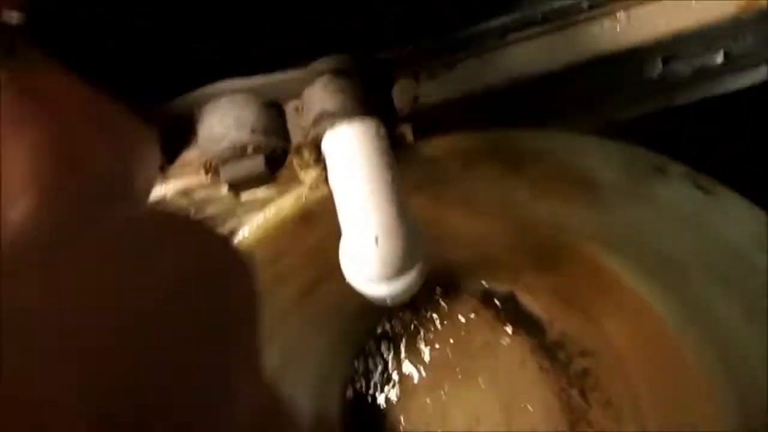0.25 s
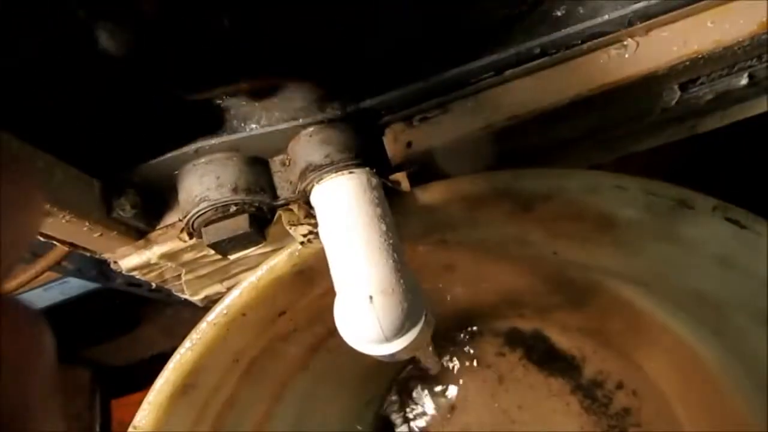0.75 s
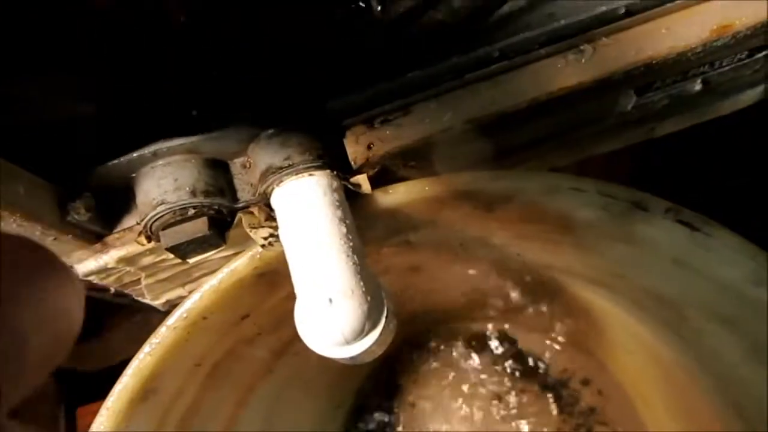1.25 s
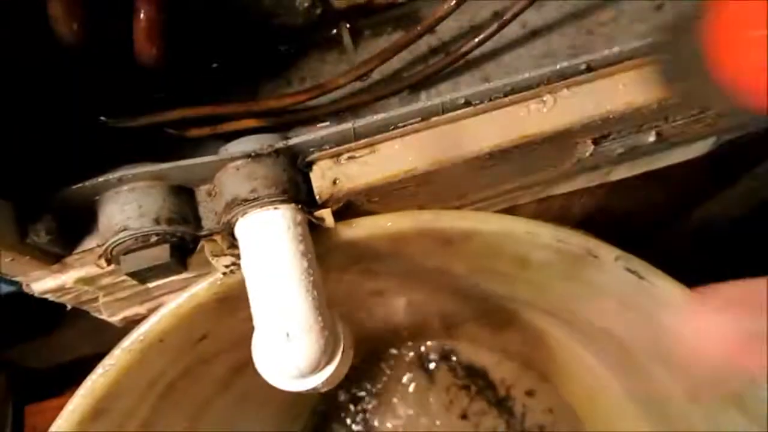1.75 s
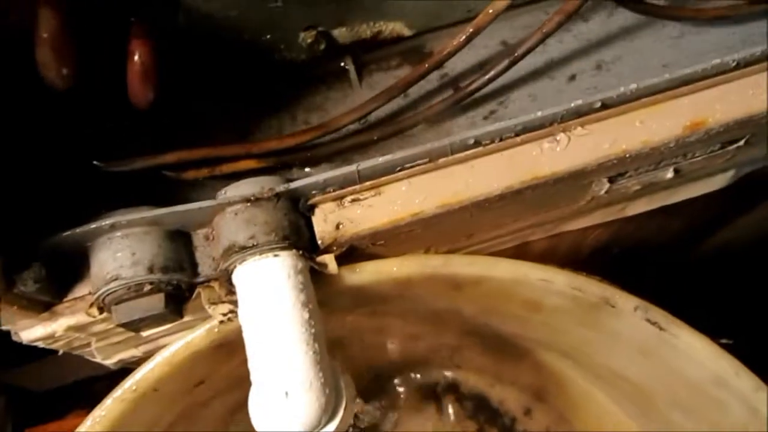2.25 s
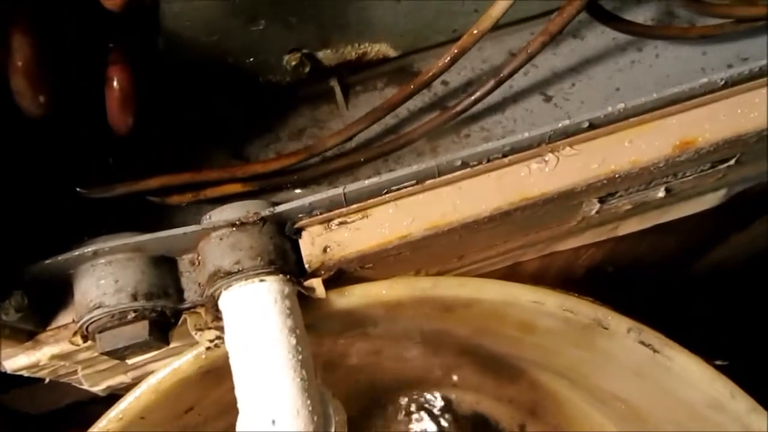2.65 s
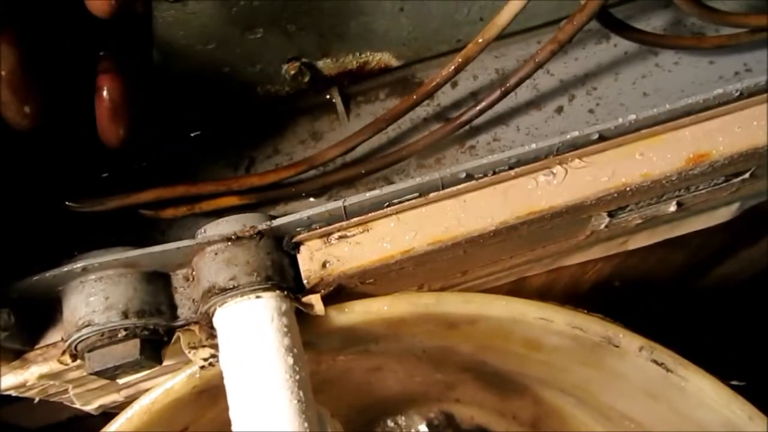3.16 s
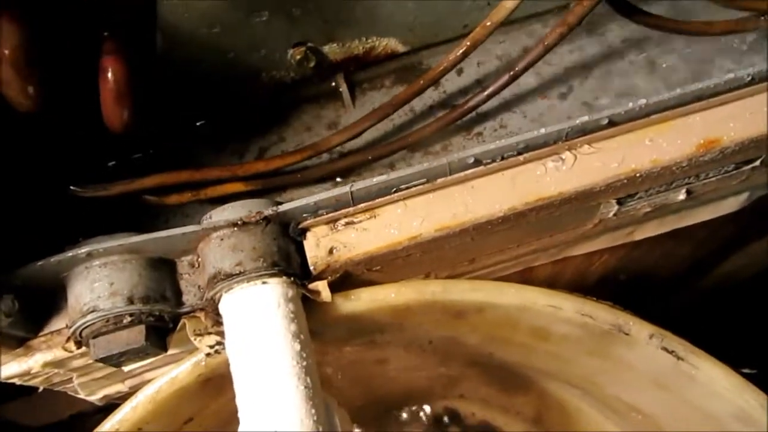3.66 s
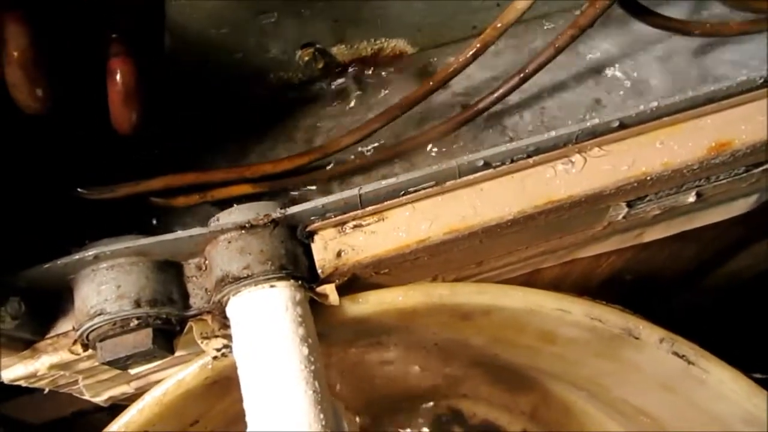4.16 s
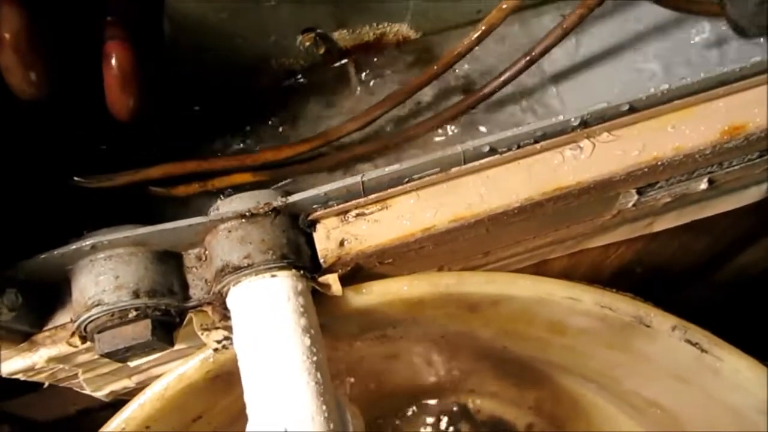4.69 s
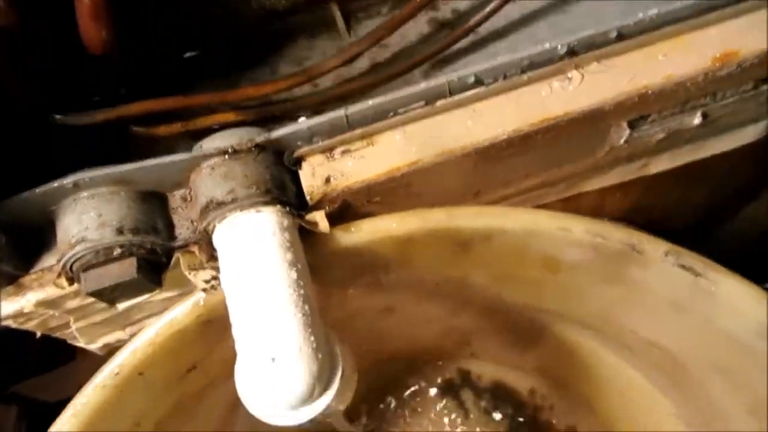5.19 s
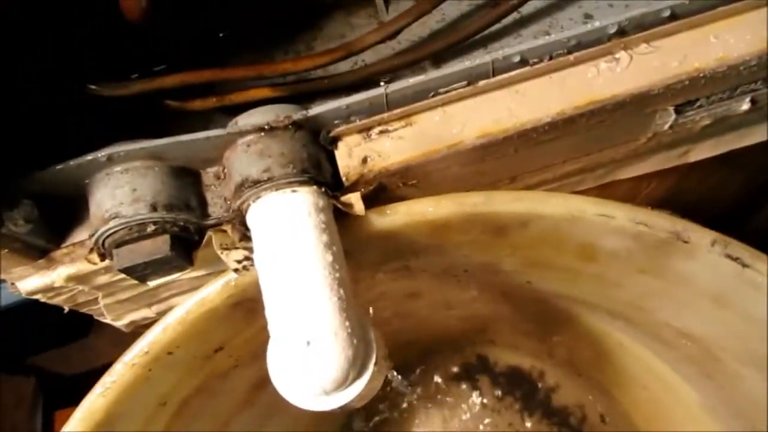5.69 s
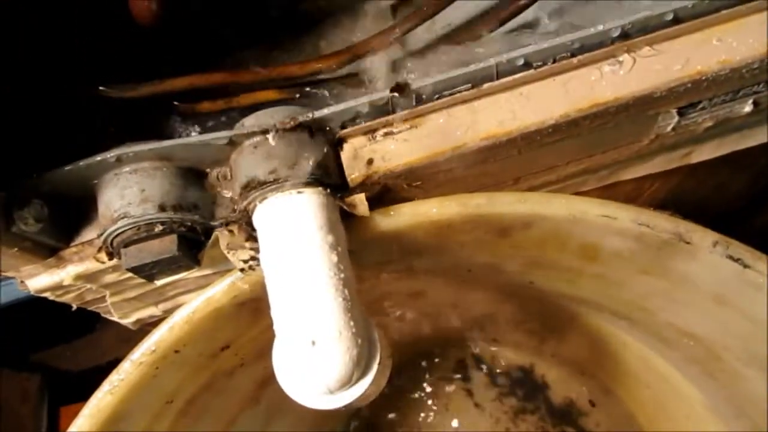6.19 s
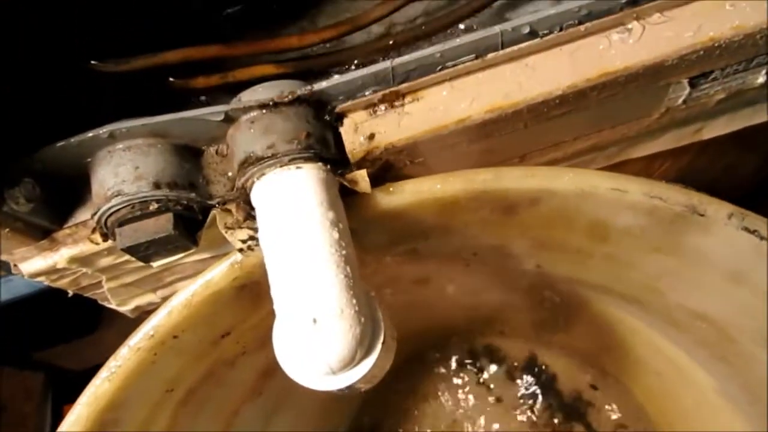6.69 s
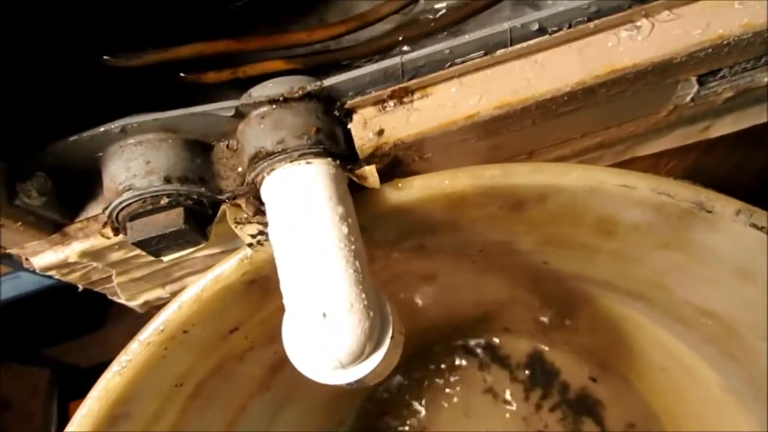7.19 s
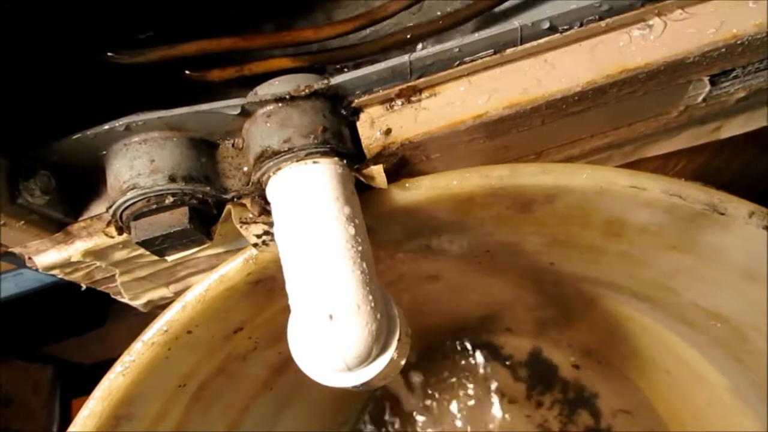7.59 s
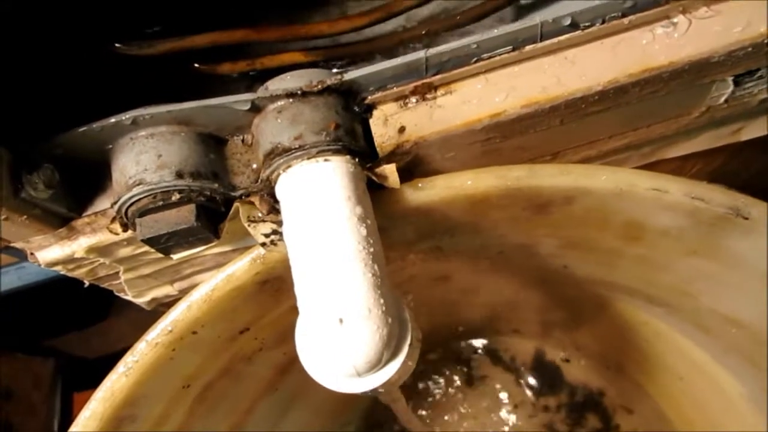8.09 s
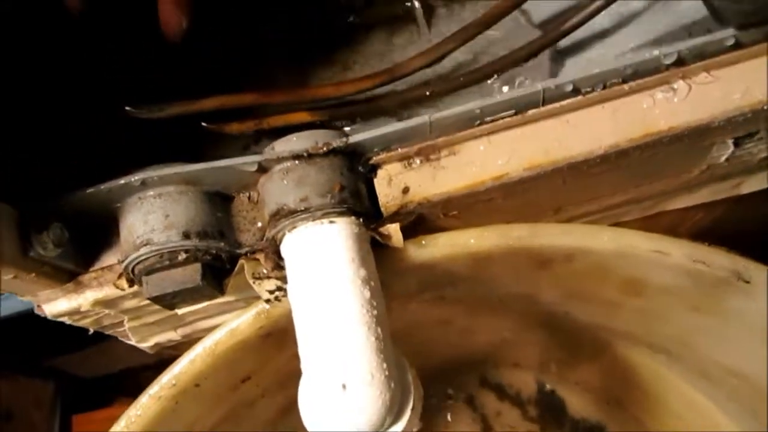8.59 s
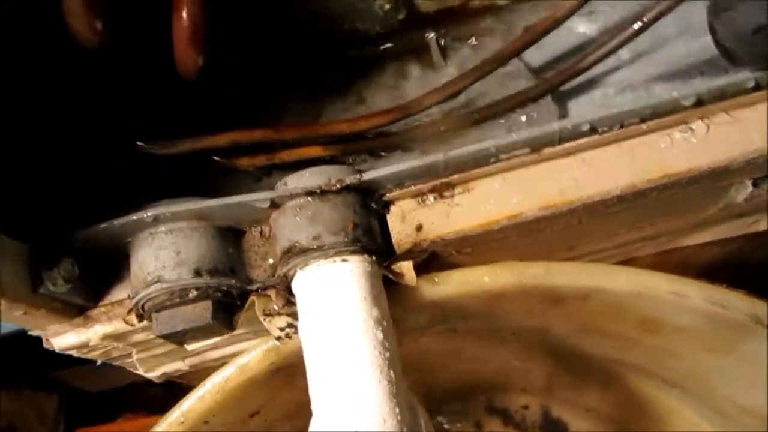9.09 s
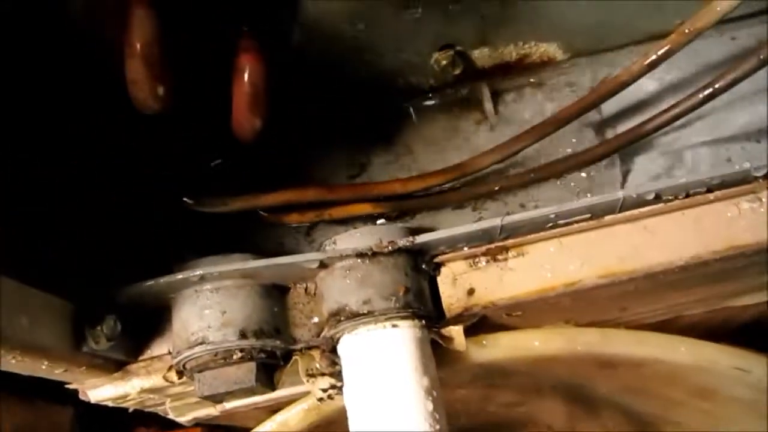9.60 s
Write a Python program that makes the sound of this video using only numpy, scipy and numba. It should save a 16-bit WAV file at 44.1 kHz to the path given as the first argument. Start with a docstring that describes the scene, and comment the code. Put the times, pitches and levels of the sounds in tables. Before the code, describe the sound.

Close, bright water jets hiss on and off against thin metal, breaking into splats and drips while a drain pipe pours into a bucket

```python
"""A bucket drum dies away, then a hose fizzes hard onto a sheet-metal pan; faint sputters, drops and gulps follow.
From 2.5 s loose drops thicken into jets, then splat again at 4.6 s over a bucket drumming under the pipe's pour.
Short jets return near 6 s; from 7 s a longer flow runs to the end with gulps, splats and another bucket drum.
Water is swelling sine bubbles and shaped hiss; pan, pipe and bucket are drifting resonances; low noise rumbles.
A hand-held camera hears it close by; its right port faces away, duller and phase-turned."""
import sys
import numpy as np
from scipy import signal
from scipy.fft import rfft, irfft
from scipy.io import wavfile
from scipy.ndimage import uniform_filter1d, minimum_filter1d
from numba import njit

SR = 44100
rng = np.random.default_rng(int(sys.argv[2]) if len(sys.argv) > 2 else 0)


def log_audio(samples):
    """Write samples as a 16-bit WAV file to the path given in sys.argv[1]."""
    # one column per channel
    frames = np.atleast_2d(samples).T
    # limit to full scale, then quantise
    limited = np.clip(frames, -1, 1)
    pcm = np.round(limited * 32767).astype(np.int16)
    wavfile.write(sys.argv[1], SR, pcm)


N = 434385
TIME = np.arange(N) / SR

# rumble of room and handling: time_s, level_db
RUMBLE = [(0, -63), (.4, -68), (.52, -105), (1.0, -89.5), (2.3, -66.5), (7.0, -67), (7.9, -62),
          (8.5, -61.5), (9.85, -84)]
# dull low thuds among the water: start_s, level_db, pitch_hz
THUDS = [(2.314, -32.5, 213), (3.94, -44, 296)]
# the pipe pours on the bucket wall: start_s, end_s, first_level_db, last_level_db,
# upper_ring_hz, upper_ring_above_lower_db
POURS = [(0, 0.048, -42, -63, 324, -5), (2.607, 3.117, -59, -65.5, 291, 2.5),
         (4.48, 5.533, -54.5, -49.5, 336.4, -5), (7.793, 9.85, -55.5, -60.5, 315, -1)]
# big bubbles gulped in pipe and bucket: start_s, level_db, pitch_hz
GULPS = [(1.515, -37, 950), (1.683, -31, 2100), (2.317, -27, 700), (7.178, -26.5, 646),
         (7.215, -26.5, 1600), (7.267, -21.5, 1750), (7.505, -28.5, 650), (7.697, -29.5, 880)]
# resonances of pan and pipe: pitch_hz, width_hz, level_db
PAN_RINGS = [(796, 13, -10), (985, 34, -8), (1594, 63, -1.5), (2370, 200, -2.5)]
# the loudest single drops: start_s, level_db, bubble_pitch_hz
DROPS = [(0.259, -29.5, 4100), (0.3985, -18, 4380), (0.4237, -15.5, 4160), (1.115, -21.5, 6450),
         (1.16, -35.5, 2250), (1.212, -28, 6290), (1.2243, -8.5, 8200), (1.246, -15.5, 8400),
         (1.26, -21, 7000), (1.276, -23, 6360), (1.499, -27.5, 7500), (1.561, -25, 7850),
         (1.598, -32, 9100), (1.6425, -31.5, 3830), (1.669, -27.5, 5730), (1.707, -33.5, 3640),
         (1.897, -29.5, 5200), (2.315, -27, 3600), (2.341, -36, 8500), (2.374, -21.5, 8300),
         (2.398, -22, 7600), (2.466, -22, 3820), (2.474, -18, 3440), (2.513, -15.5, 8300),
         (2.56, -10, 8900), (2.597, -18, 9500), (2.6206, -15.5, 8700), (2.671, -20, 10500),
         (2.71, -21, 7150), (2.7912, -16.5, 7400), (2.806, -16.5, 6700), (2.839, -17.5, 8350),
         (2.865, -25, 7640), (2.8878, -20, 8400), (2.926, -14.5, 5830), (2.96, -18.5, 4060),
         (2.979, -24, 7960), (3.021, -24, 6580), (3.042, -15, 5600), (3.0715, -17.5, 7040),
         (3.101, -20.5, 8300), (3.137, -21, 8790), (3.148, -14, 6160), (3.25, -19, 6750), (3.28, -17, 6600),
         (3.356, -13, 6240), (3.5035, -9.5, 7300), (4.6104, -8.5, 2470), (4.666, -23.5, 4140),
         (4.7292, -15, 7440), (4.7868, -13.5, 7340), (4.9208, -16.5, 7900), (4.9927, -17, 8600),
         (5.024, -16.5, 7040), (5.042, -15.5, 7250), (5.134, -19.5, 5600), (5.149, -16, 7100),
         (5.204, -20, 7400), (5.2435, -16.5, 7000), (5.403, -21, 4130), (5.438, -23, 2900),
         (5.57, -21, 8200), (5.639, -23, 2980), (5.682, -17.5, 5400), (5.753, -14.5, 8400),
         (6.897, -20.5, 5900), (6.902, -27.5, 2920), (6.933, -29.5, 4650), (7.171, -14, 9650),
         (7.4682, -17, 3400), (7.4966, -12, 7900), (7.9618, -10, 5600), (8.2684, -14.5, 5900),
         (8.3185, -14, 9150), (8.363, -9.5, 7100), (8.447, -15, 6850), (8.5782, -13, 7360),
         (8.812, -15.5, 4240), (8.893, -19, 3050), (9.055, -20.5, 3000), (9.1821, -15, 5150),
         (9.346, -14, 5900), (9.3975, -12, 4950), (9.66, -12, 10800)]
# spells of the hose, steady jet or broken sputter: start_s, rise_s, end_s, first_spray_db, last_spray_db,
# patter_above_spray_db, gurgle_above_spray_db
HOSE = [(0.394, 0.049, 0.95, -22.5, -25.5, -45, -48), (1.09, 0.025, 1.23, -56, -50, -1, -10),
        (1.83, 0.007, 2.37, -50.5, -55, -3, -13), (2.31, 0.007, 2.447, -48.5, -49.5, 9.5, 3),
        (2.52, 0.03, 3.37, -42, -42.5, 5.5, -6), (3.36, 0.043, 3.49, -29, -27, -5.5, -22.5),
        (3.5, 0.023, 3.913, -34.5, -26, -16.5, -18), (3.9, 0.0027, 4.6, -30.5, -29.5, -11, -17.5),
        (4.6, 0.0081, 5.93, -45.5, -46.5, 7.5, -1.5), (5.9, 0.12, 6.23, -22, -26.5, -29, -22.5),
        (6.521, 0.1, 6.68, -40, -37.5, -3.5, -12.5), (6.94, 0.2, 8.405, -32.5, -29.5, -9, -15.5),
        (8.37, 0.0073, 10.22, -36.5, -32.5, -5, -12.5)]
# base colour of the spray: frequency_hz, density_db (per Hz)
SPRAY_COLOUR = [(450, -31), (800, -18.5), (2100, -11.5), (4300, -10.5), (5900, -8), (8800, -2),
                (10500, -6.5), (13500, -11.5), (16000, -17.5)]
# right port shaded against left: frequency_hz, left_louder_db
BALANCE = [(60, 1.4), (200, 3.7), (2400, 11), (8000, 18.9), (15000, 26.7)]
# phase between the ports: frequency_hz, left_leads_rad
LEAD = [(60, 0), (260, 1.3), (600, 2.8), (15000, 4.6)]
# how alike the ports are: frequency_hz, likeness (0-1)
ALIKE = [(40, .5), (300, .85), (1000, .88), (15000, .45)]

ROOM_DB = -58  # faint trickle and room hiss
POUR_RISE_S, POUR_FALL_S, DRY_DB = 0.034, 0.23, -68
BUCKET_HZ, BUCKET_WIDTH_HZ, UPPER_WIDTH_HZ = 195, 44, 22
BUCKET_WANDER, PAN_WANDER = .015, .025  # typical share by which each ring's pitch drifts
SPRAY_FALL_S, SHUT_DB = 0.09, -53  # each spell falls to this spray level, then stops
DRIP_DB, DRIP_PATTER_DB, DRIP_GURGLE_DB = -59.5, -5, -15  # floor of spray; the others relative to it
SWELL_CYCLES = 0.4  # time constant of a bubble's onset
CASING_T60_S, CASING_DB = .03, -8
LIMIT, LIMIT_S = .97, .002  # full-scale share, half the look-around
TOP_HZ = 15700


def undb(db):
    """Decibels to amplitude."""
    return 10 ** (np.asarray(db) / 20)


def unit(x):
    """Scale to an RMS of 1."""
    return x / np.sqrt(np.mean(x ** 2))


def curves(table):
    """Columns of a time table, one value a sample."""
    s, *columns = np.transpose(table)
    return [np.interp(TIME, s, c) for c in columns]


def along(table):
    """A frequency table read on the bins of the spectrum, along log frequency."""
    hz, value = np.transpose(table)
    return np.interp(np.log(np.fft.rfftfreq(N, 1 / SR) + 1), np.log(hz), value)


def band(x, hz, width_hz):
    """Fixed resonance with gain 1 at the centre."""
    return signal.lfilter(*signal.iirpeak(hz, hz / width_hz, fs=SR), x)


@njit
def moving_band(x, hz, width_hz):
    """Resonance whose centre moves sample by sample, gain 1 at the centre."""
    y, band_state, low_state = np.empty(len(x)), 0., 0.
    for i in range(len(x)):
        g, damping = np.tan(np.pi * hz[i] / SR), width_hz / hz[i]
        v = (band_state + g * (x[i] - low_state)) / (1 + g * (g + damping))
        band_state = 2 * v - band_state
        low_state = low_state + 2 * g * v
        y[i] = damping * v
    return y


def walk(rate):
    """Random levels, a new one each 1 / rate s, smoothed twice; spread near 1."""
    k = int(SR / rate)
    steps = np.repeat(rng.standard_normal(N // k + 1), k)
    return 4 / 3 * uniform_filter1d(uniform_filter1d(steps, k), k)[:N]


def spell(start, rise, end, fall, first_db, last_db, quiet_db):
    """Gain that rises from quiet, drifts from first to last level and falls back; silent outside."""
    times = [start, start + rise, max(end, start + rise + 1e-3), end + fall]
    db = np.interp(TIME, times, [quiet_db, first_db, last_db, quiet_db])
    return undb(db) * (TIME >= start) * (TIME <= end + fall)


@njit
def ring(out, start, hz, cycles, size, glide, swell):
    """Decaying sines that swell in, fade by 60 dB over their cycles and glide up by a share of the pitch."""
    for g in range(len(start)):
        length = int(cycles[g] * SR / hz[g])
        z, fade = size[g] + 0j, np.log(1000.) / max(length, 1)
        p = np.exp(2j * np.pi * hz[g] / SR - fade)
        turn = np.exp(2j * np.pi * hz[g] / SR * glide / max(length, 1))
        held, step = 1., np.exp(-hz[g] / SR / swell)
        for i in range(start[g], min(start[g] + length, len(out))):
            out[i] += z.imag * (1 - held) ** 2
            z *= p
            p *= turn
            held *= step
    return out


def bubbles(s, hz, cycles, size, glide, swell=SWELL_CYCLES):
    """Air bubbles under water, each a short sine ringing at its own pitch from time s."""
    start = np.clip(s * SR, 0, N - 1).astype(np.int64)
    hz = np.clip(hz, 50, .4 * SR)
    return ring(np.zeros(N), start, hz, cycles + 0 * s, size + 0 * s, float(glide), float(swell))


def shower(count, lo_hz, hi_hz, cycles, spread_db, glide):
    """Bubbles at random moments and sizes, a few much louder than the rest."""
    u = rng.random((count, 4)).T
    size = undb(-spread_db * np.log(1 - u[2])) * np.sign(u[3] - .5)
    pitch = lo_hz * (hi_hz / lo_hz) ** u[1]
    length = cycles * (.5 + np.abs(2 * u[3] - 1))
    return unit(bubbles(u[0] * N / SR, pitch, length, size, glide))


def splats(s, db, hz, cycles, octaves, scatter_s, mist_db, mist_s):
    """A drop spreads over a few ms, traps bubbles around its own pitch and throws a broad mist of droplets."""
    u = rng.random((len(s), 6, 3))
    late = scatter_s * u[..., 0] ** 2
    pitch = hz[:, None] * 2 ** (octaves * (u[..., 1] - u[..., 2]))
    size = undb(db[:, None] - 1560 * late) * np.sign(u[..., 2] - .5)  # later bubbles are weaker
    body = bubbles((s[:, None] + late).ravel(), pitch.ravel(), cycles, size.ravel(), 0.33)
    u = rng.random((len(s), 40, 4))
    late = -mist_s / 2 * np.log((1 - u[..., 0]) * (1 - u[..., 3]))  # mist_s on average
    floor_hz = .4 * hz[:, None]
    pitch = floor_hz + (17000 - floor_hz) * u[..., 1] ** 1.8
    size = undb(db[:, None] + mist_db - 130 * late) * (2 * u[..., 2] - 1)
    size = size * np.minimum(pitch / hz[:, None], 1) ** 2  # weaker below the drop's pitch
    return body + bubbles((s[:, None] + late).ravel(), pitch.ravel(), 17.9, size.ravel(), 0)


def room():
    """Faint trickle and room tone as steady, broadly band-shaped noise."""
    hiss = band(band(rng.standard_normal(N), 960, 11000), 960, 11000)
    return undb(ROOM_DB) * unit(hiss)


def rumble(level_db):
    """Room and handling rumble: low band noise that wavers in level."""
    low = band(band(rng.standard_normal(N), 63, 87), 63, 87)
    return unit(low) * undb(level_db + 1.6 * walk(14))


def thuds():
    """Dull low thuds, each a short low sine with a quick swell."""
    s, db, hz = np.transpose(THUDS)
    return bubbles(s, hz, 11.5, undb(db), 0.069, swell=0.053)


def bucket(rumble_db):
    """The stream's noise excites two wavering rings of the bucket wall."""
    # between pours the drum rests at its dry level, or at the rumble's where that is lower
    rest = undb(DRY_DB) * np.minimum(undb(rumble_db - DRY_DB), 1)
    gains = np.array([rest + spell(start - POUR_RISE_S, POUR_RISE_S, end, POUR_FALL_S, first_db, last_db, DRY_DB)
                      for start, end, first_db, last_db, *_ in POURS])
    # the strongest pour sets the upper ring
    upper_hz, upper_db = np.array(POURS)[gains.argmax(axis=0), -2:].T
    stream = rng.standard_normal(N) * undb(walk(16))

    def wall(hz, width_hz):
        """One ring of the wall, drifting in pitch."""
        hz = hz * (1 + BUCKET_WANDER * walk(7))
        return unit(moving_band(moving_band(stream, hz, 1. * width_hz), hz, 1. * width_hz))

    drum = wall(BUCKET_HZ, BUCKET_WIDTH_HZ) + undb(upper_db) * wall(upper_hz, UPPER_WIDTH_HZ)
    return drum * gains.max(axis=0)


def low_end():
    """Rumble, bucket drum and thuds together."""
    rumble_db, = curves(RUMBLE)
    return rumble(rumble_db) + bucket(rumble_db) + thuds()


def gulps():
    """Each gulp is four long bubbles close in time and pitch, the first the loudest."""
    s, db, hz = np.transpose(GULPS)
    u = rng.random((len(s), 4, 2))
    late = 0.045 * u[..., 0] * np.arange(4) / 3
    pitch = hz[:, None] * (1 + 0.37 * (u[..., 1] - .5))
    size = undb(db[:, None] - 120 * late)
    return bubbles((s[:, None] + late).ravel(), pitch.ravel(), 16.6, size.ravel(), 0)


def pan_rings(x):
    """Pan and pipe resonate; each ring comes, goes and drifts in pitch as the water shifts."""
    total = np.zeros(N)
    for k, (hz, width_hz, db) in enumerate(PAN_RINGS):
        level = (-1) ** k * undb(db + 3.3 * walk(8))  # neighbours in opposite sign
        total += level * moving_band(x, hz * (1 + PAN_WANDER * walk(3)), 1. * width_hz)
    return total


def gurgle():
    """Larger bubbles and splashes, partly through the resonances of pan and pipe."""
    water = shower(count=9000, lo_hz=525, hi_hz=3605, cycles=19.6, spread_db=1.0, glide=0.32)
    return unit(unit(pan_rings(water)) * undb(1.0) + water)


def patter():
    """Many small drops of all pitches, most of them faint, each a splat with its mist."""
    u = rng.random((1300, 3)).T
    pitch = 2400 * 3.73 ** np.sqrt(u[2])
    return unit(splats(u[0] * N / SR, -24 * np.sqrt(u[1]), pitch, 9.5, 0.55, 0.0046, 1.7, .004))


def loud_drops():
    """The loudest drops, one splat of trapped bubbles and mist each."""
    s, db, hz = np.transpose(DROPS)
    return splats(s, db, hz, 32.6, 0.32, .004, -1.5, .003)


def hose():
    """Gains of spray, patter and gurgle: the strongest spell leads, and the pan keeps dripping below."""
    rows = [undb([[DRIP_DB], [DRIP_DB + DRIP_PATTER_DB], [DRIP_DB + DRIP_GURGLE_DB]]) + 0 * TIME]
    for start, rise, end, first_db, last_db, patter_db, gurgle_db in HOSE:
        gain = spell(start, rise, end, SPRAY_FALL_S, first_db, last_db, SHUT_DB)
        rows.append(undb([[0], [patter_db], [gurgle_db]]) * gain)
    return np.max(rows, axis=0)


def spray(jet):
    """Fine bubble fizz and hiss, coloured by the jet; a harder jet is brighter."""
    fizz = shower(count=30000, lo_hz=4000, hi_hz=14000, cycles=12, spread_db=2.2, glide=0.1)
    spectrum = rfft(fizz + undb(2.0) * rng.standard_normal(N))
    flat = spectrum / uniform_filter1d(np.abs(spectrum), size=4000)
    coloured = unit(irfft(flat * undb(along(SPRAY_COLOUR)), N))
    low = signal.lfilter(*signal.butter(2, 5000, fs=SR), coloured)
    bright = coloured - .5 * jet / jet.max() * low
    return jet * bright * undb(.5 * walk(40))


def casing(x):
    """Close metal walls smear each splash into a short coloured tail; the colour shifts as the hand moves."""
    t = TIME[:int(.06 * SR)]
    tails = rng.standard_normal((3, len(t))) * undb(-60 * t / CASING_T60_S)
    turn = np.array([walk(5) for tail in tails])
    turn = turn / np.sqrt(np.sum(turn ** 2, axis=0))  # the tails trade places at constant power
    smear = np.zeros(N)
    for k, tail in zip(turn, tails):
        smear += k * signal.fftconvolve(x, tail / np.sqrt(np.sum(tail ** 2)))[:N]
    return x + undb(CASING_DB) * smear


def scene():
    """All water sounds in the cramped casing; the second row is what reaches the far port by other paths."""
    jet, loose, slosh = hose()
    drops = loose * patter() + loud_drops()
    water = room() + gulps() + undb(-9.5) * pan_rings(drops) + slosh * gurgle() + drops + spray(jet)
    # small bubbles and droplets carry no bass
    water = signal.sosfilt(signal.butter(3, 360, "high", fs=SR, output="sos"), water)
    dry = low_end() + casing(water)
    # those paths keep shifting as water and hand move, so their sign and strength wander
    return np.array([dry, dry * unit(walk(60))])


def record(dry):
    """The right port is shaded and phase-turned; a limiter ducks the peaks, then the top is cut."""
    left, other = rfft(dry)
    alike = np.clip(along(ALIKE), 0, 1)
    shade = undb(-along(BALANCE))
    turn = np.exp(-1j * along(LEAD))
    right = shade * (alike * turn * left + np.sqrt(1 - alike ** 2) * other)
    # set levels for the mean of both ports, despite their partial cancelling
    gain = 2 / np.sqrt(1 + shade ** 2 + 2 * shade * alike * turn.real)
    ports = irfft(gain * np.array([left, right]), N)
    span = int(LIMIT_S * SR)
    duck = LIMIT / np.maximum(np.abs(ports).max(axis=0), LIMIT)
    ports = ports * uniform_filter1d(minimum_filter1d(duck, size=2 * span), size=span)
    return signal.sosfilt(signal.ellip(10, .2, 80, TOP_HZ, fs=SR, output="sos"), ports)


dry = scene()
out = record(dry)
log_audio(out)
```